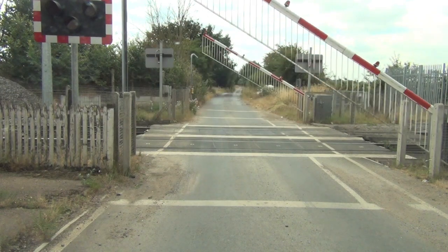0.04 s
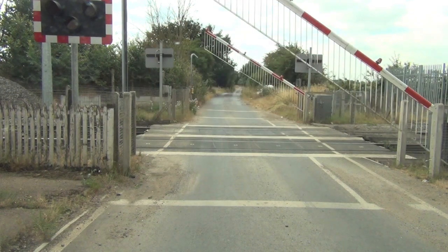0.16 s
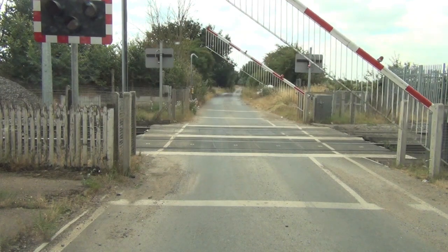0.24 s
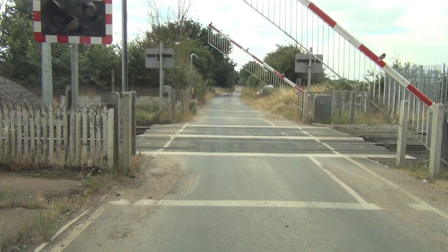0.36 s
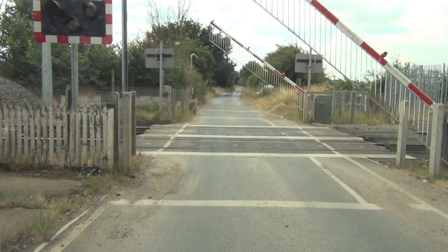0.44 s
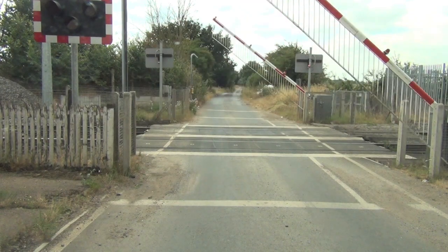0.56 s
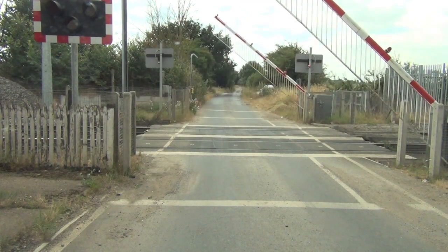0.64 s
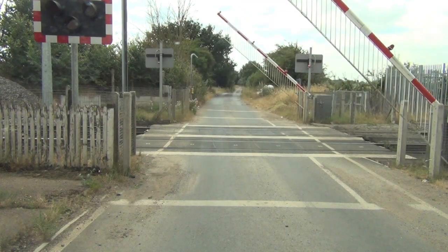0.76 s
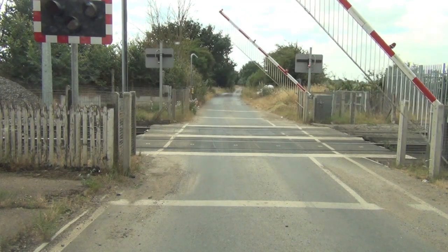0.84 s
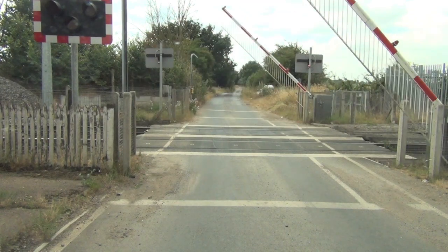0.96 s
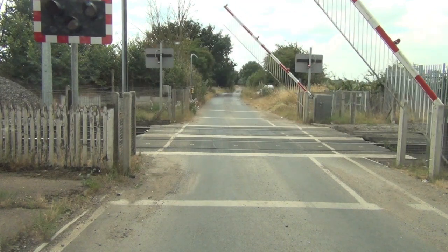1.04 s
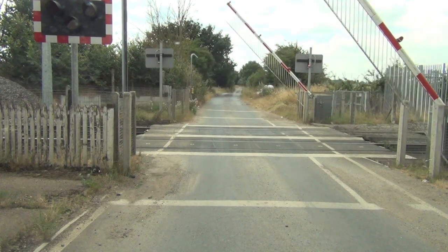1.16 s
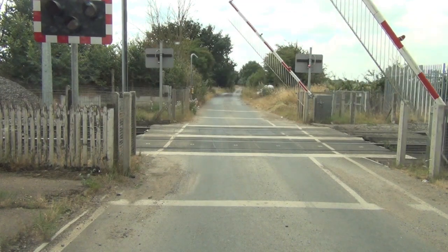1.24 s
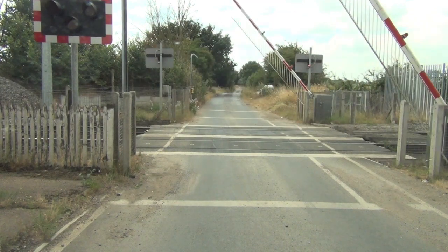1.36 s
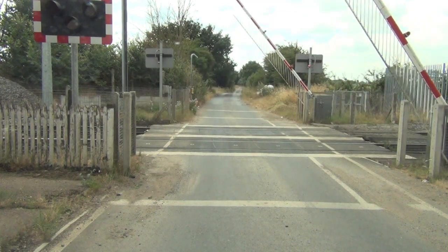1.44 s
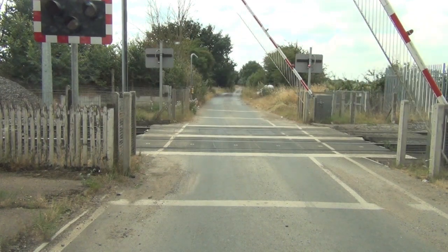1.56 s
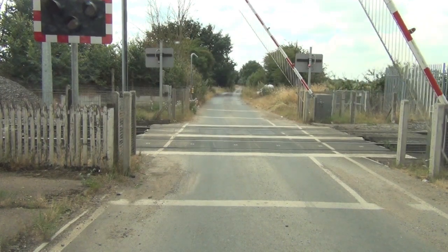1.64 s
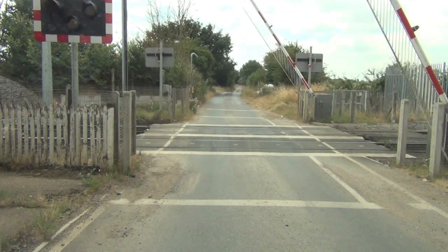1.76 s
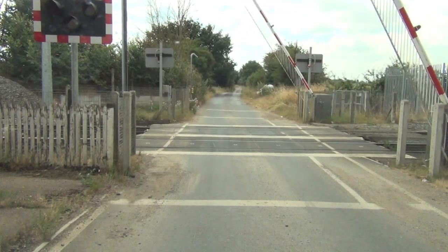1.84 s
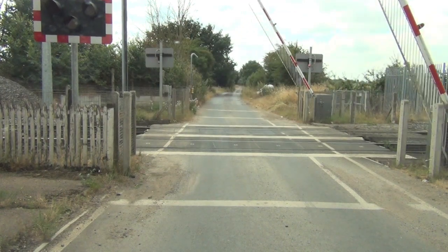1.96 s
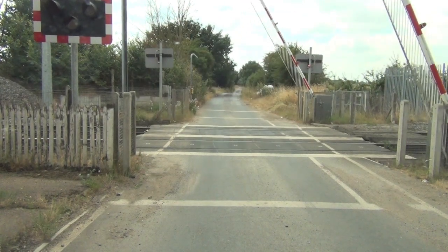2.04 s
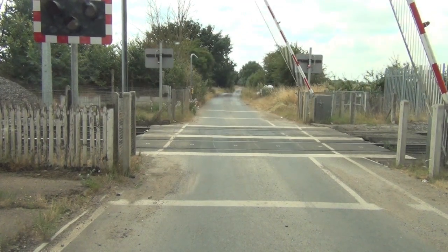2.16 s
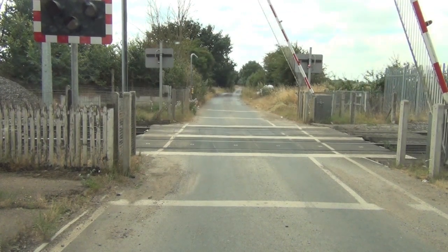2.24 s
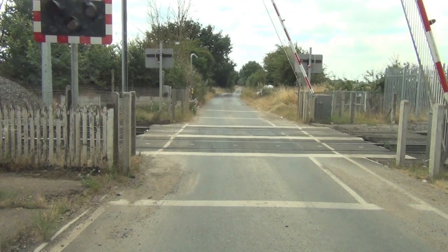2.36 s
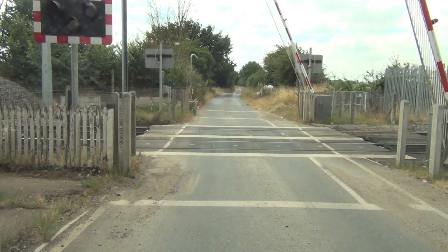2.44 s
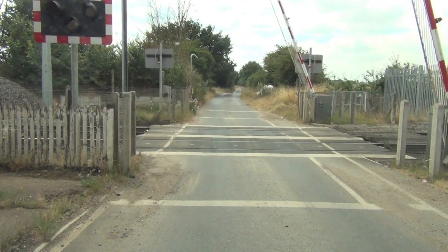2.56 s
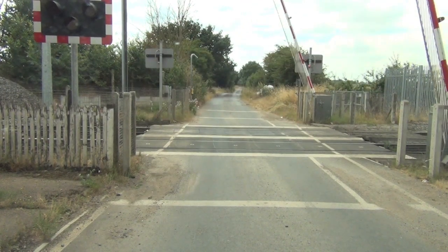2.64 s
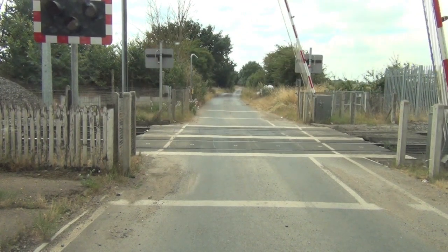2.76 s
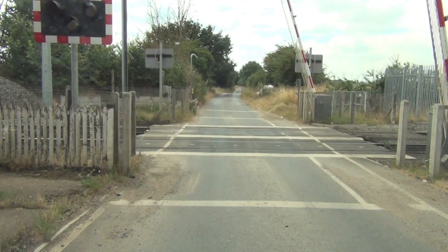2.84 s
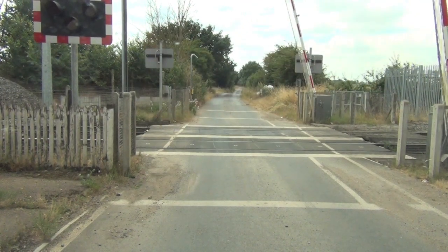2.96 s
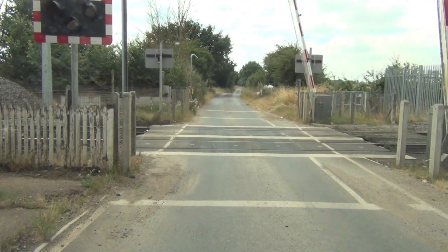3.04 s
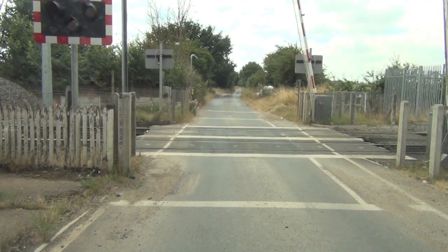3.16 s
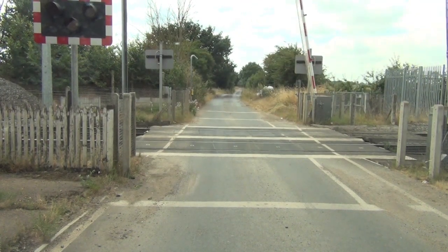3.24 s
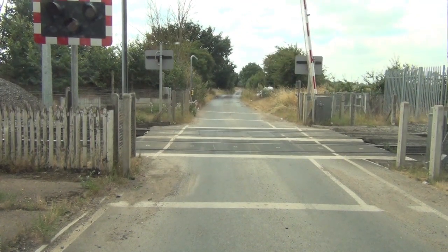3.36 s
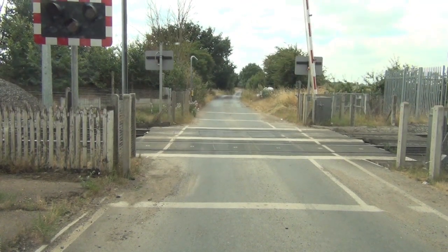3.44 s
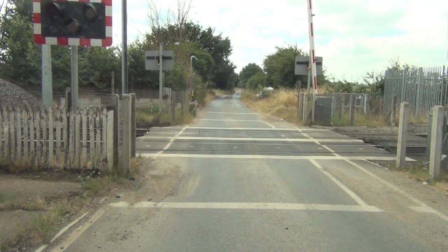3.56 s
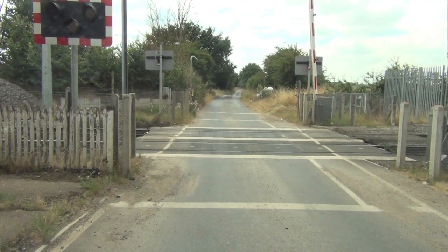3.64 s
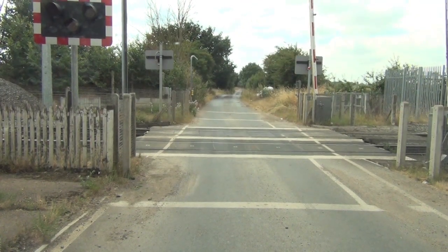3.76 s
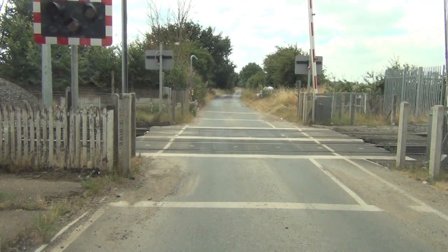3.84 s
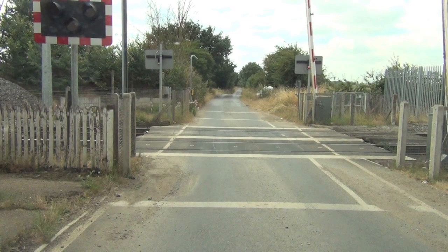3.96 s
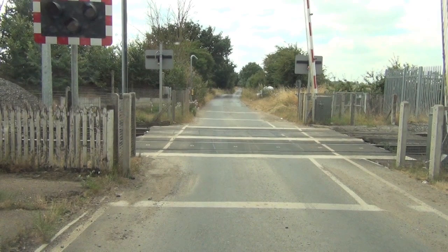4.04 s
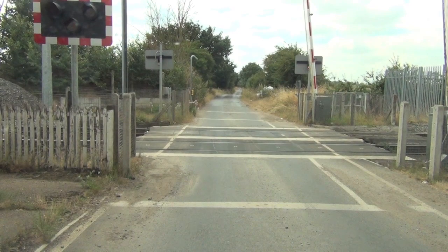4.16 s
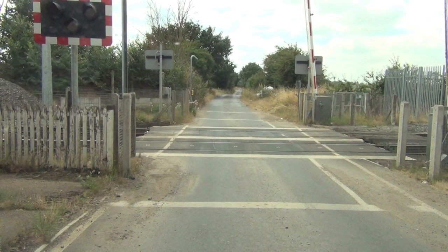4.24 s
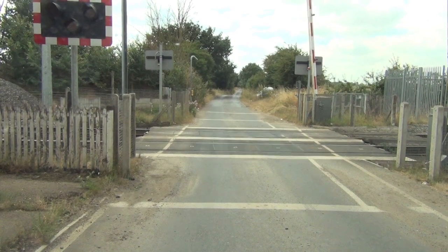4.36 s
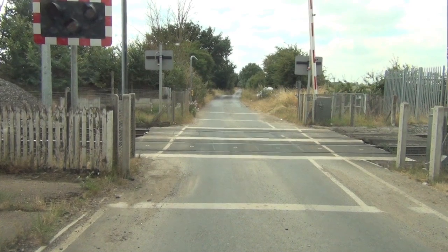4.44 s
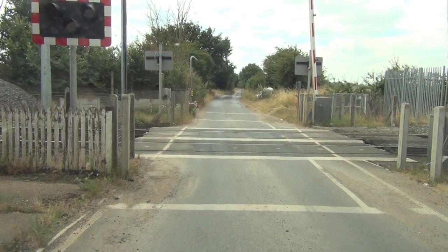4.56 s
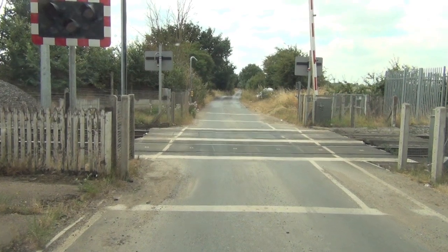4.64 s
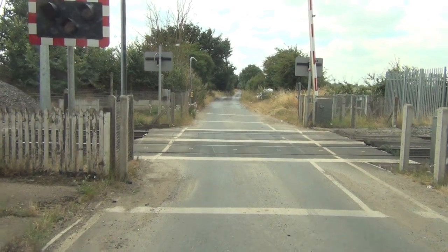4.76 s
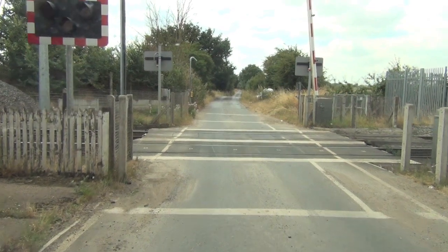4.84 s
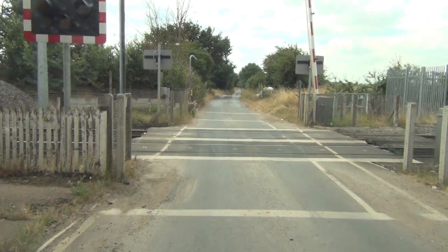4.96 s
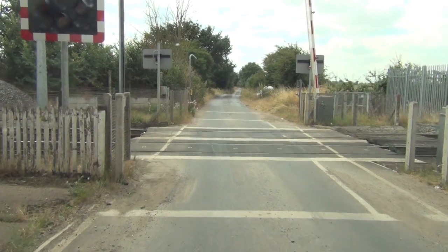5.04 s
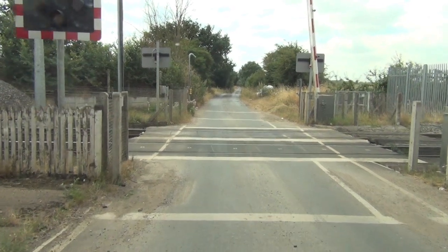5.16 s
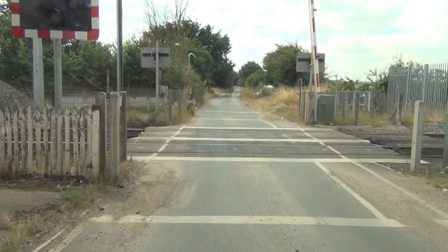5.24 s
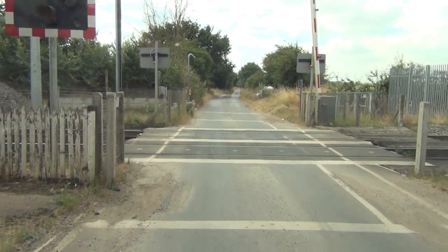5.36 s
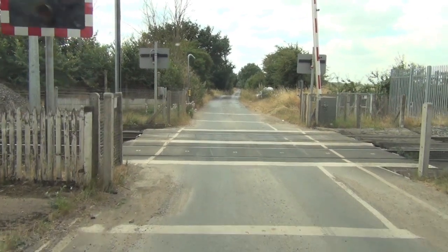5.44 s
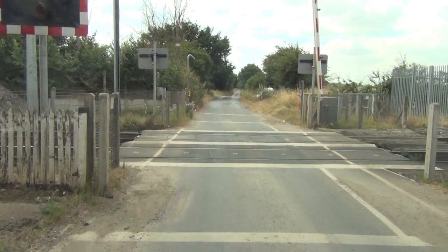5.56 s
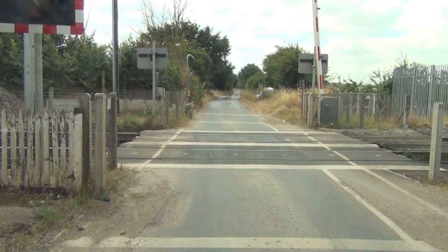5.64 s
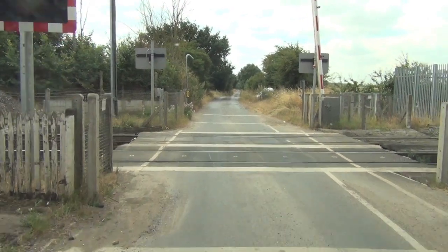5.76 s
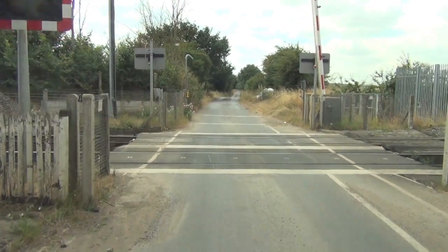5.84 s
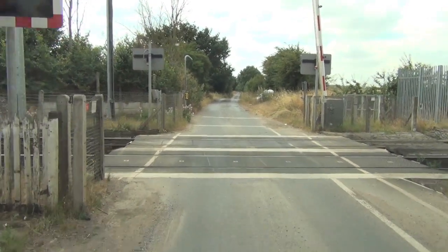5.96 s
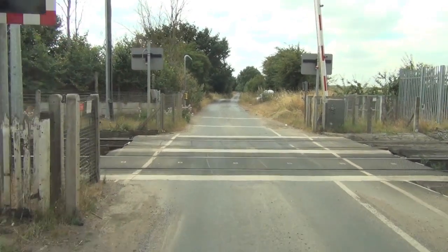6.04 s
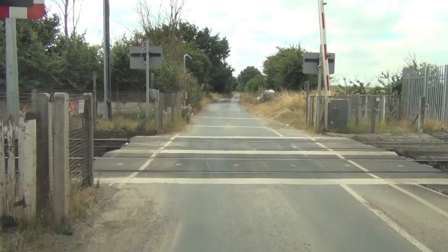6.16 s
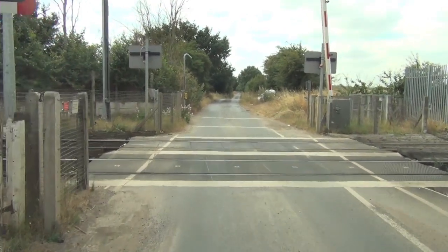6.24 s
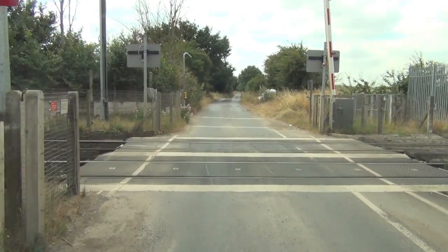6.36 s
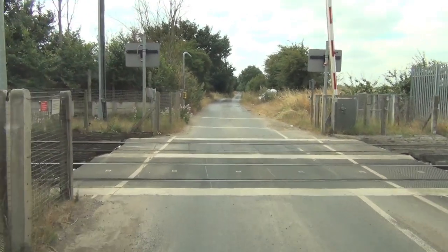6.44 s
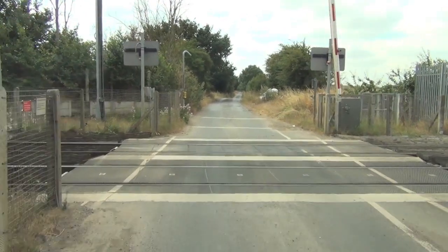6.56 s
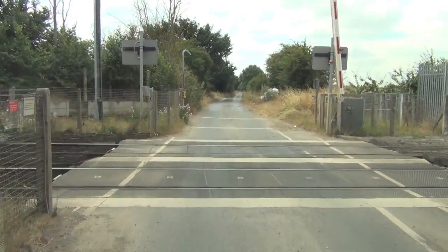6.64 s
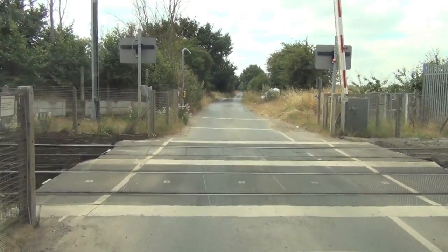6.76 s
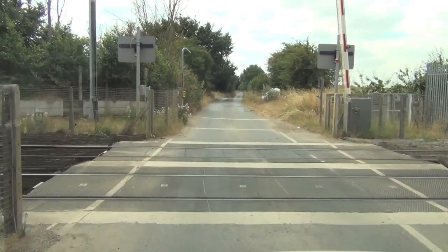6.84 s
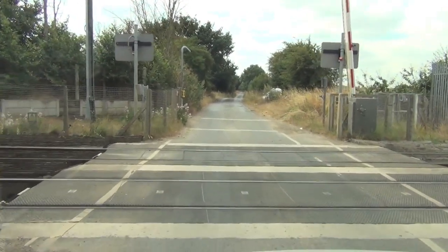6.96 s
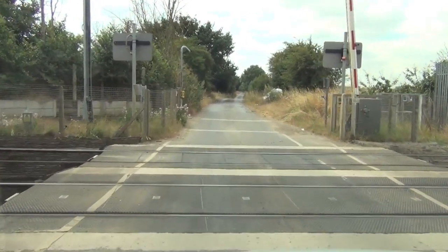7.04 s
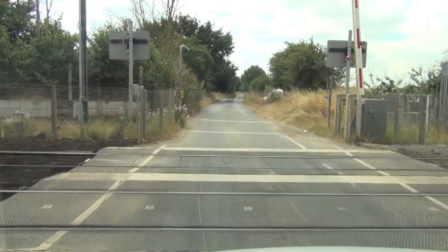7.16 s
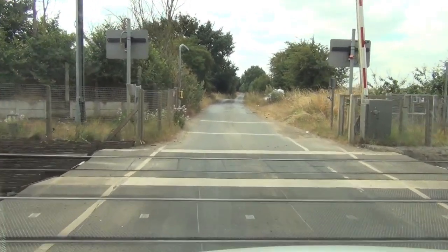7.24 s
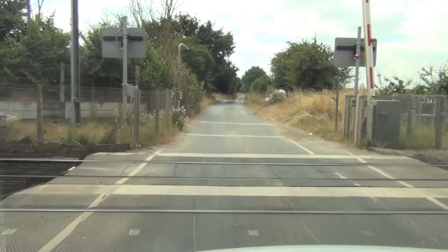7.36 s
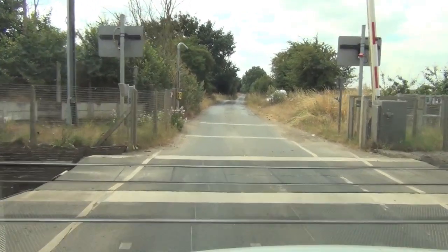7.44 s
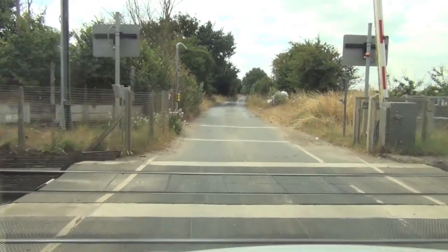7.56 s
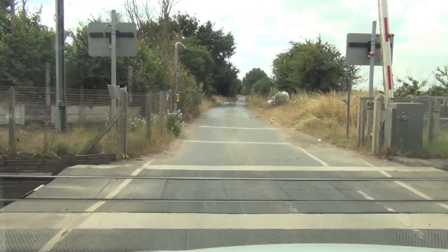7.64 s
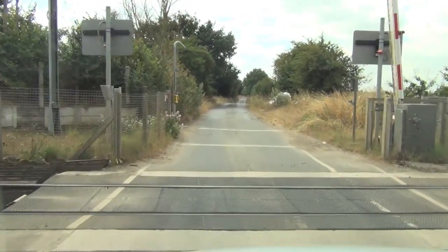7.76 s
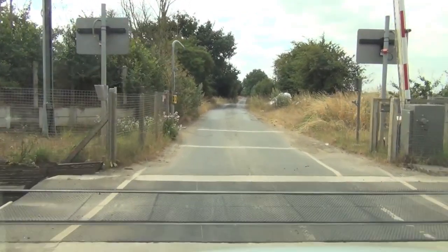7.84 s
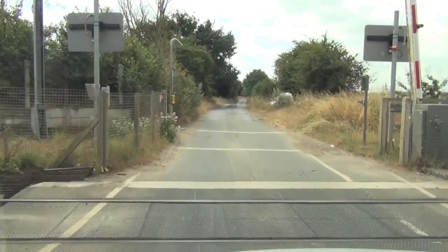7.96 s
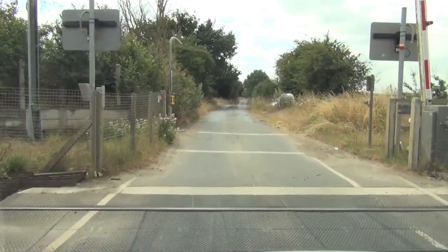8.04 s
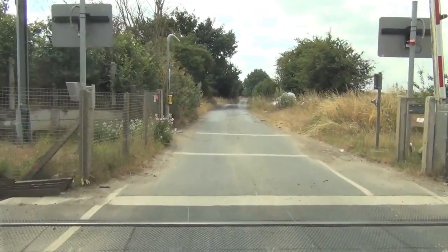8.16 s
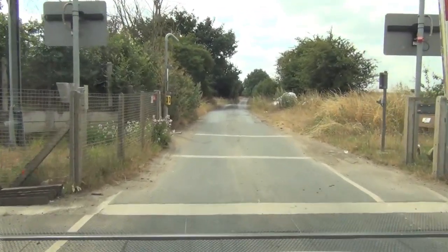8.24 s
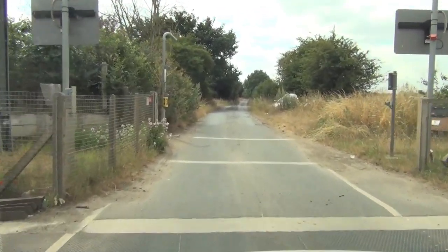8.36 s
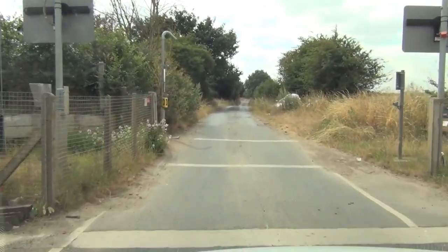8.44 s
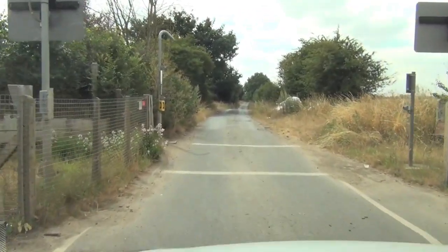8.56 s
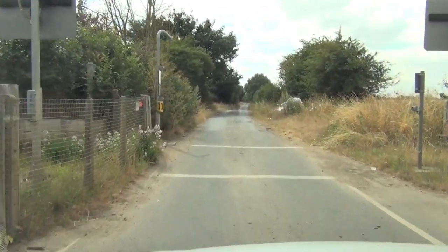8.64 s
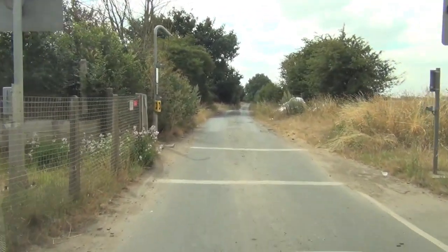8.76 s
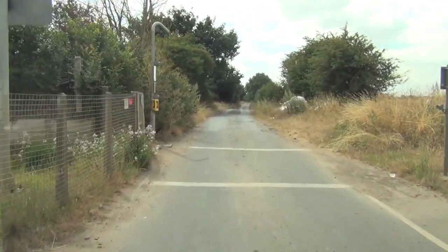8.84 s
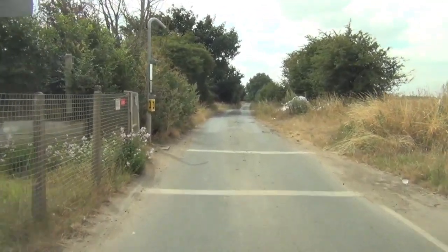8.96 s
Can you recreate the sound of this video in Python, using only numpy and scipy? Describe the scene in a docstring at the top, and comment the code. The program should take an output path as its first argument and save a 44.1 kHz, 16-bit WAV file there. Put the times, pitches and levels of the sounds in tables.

```python
"""Small car over a level crossing

Heard from inside: controls click, the starter cranks, and the four-cylinder engine catches, idles, is revved
and pulls away. A lever knocks, the door locks snap, and tyres thump over the rails, shaking the trim.
The engine is firing-rate harmonics plus pulsed noise, the starter a whirr plus gear noise, and the small parts
are decaying noise bursts. Blows excite panel resonances, over faint hiss and a thin interrupted whine."""
import sys
import numpy as np
from scipy import signal
from scipy.fft import rfft, irfft, next_fast_len
from scipy.io import wavfile
from scipy.ndimage import uniform_filter1d

SR = 44100
rng = np.random.default_rng(int(sys.argv[2]) if len(sys.argv) > 2 else 0)


def bounce(signal):
    """Save signal as a 16-bit WAV file at the path given by the first command-line argument."""
    frames = np.transpose(np.atleast_2d(signal))
    limited = np.clip(frames, -1, 1)
    pcm = np.round(limited * 32767).astype(np.int16)
    wavfile.write(sys.argv[1], SR, pcm)


N = 397341
TIME = np.arange(N) / SR


def from_db(db):
    """Amplitude gain is an exponential function of level in decibels."""
    return 10 ** (np.asarray(db) / 20)


def rms_one(x):
    """Normalisation: division by the root mean square gives unit power."""
    return x / np.sqrt(np.mean(x ** 2) + 1e-20)


def in_time(rows):
    """Linear interpolation: each column of a curve at every sample."""
    s, *columns = np.transpose(rows)
    return [np.interp(TIME, s, column) for column in columns]


def at_hz(points, hz):
    """Logarithmic frequency: a curve in dB is read between its points on a log axis."""
    curve = np.array(points)
    return np.interp(np.log(hz), np.log(curve[:, 0]), curve[:, 1])


def coloured(x, db_at):
    """Linear filtering: each frequency is weighted by a smooth dB curve."""
    size = next_fast_len(N + 4096, True)
    hz = np.maximum(np.arange(size // 2 + 1) * SR / size, 1)
    return irfft(rfft(x, size) * from_db(db_at(hz)), size)[:N]


# cabin resonances: (centre [Hz], width [Hz], boost [dB])
CABIN_MODES = [(378, 10.4, 4.5), (817, 46, 5), (1647, 140, 3.5), (3546, 57, 4), (6150, 550, 3.5)]


def noise(spectrum, resonances=CABIN_MODES):
    """Source and resonator: random noise takes the source spectrum and the resonant peaks, at unit rms."""
    def db_at(hz):
        db = at_hz(spectrum, hz)
        for centre, width, boost_db in resonances:
            db = db + boost_db / (1 + (2 * (hz - centre) / width) ** 2)
        return db
    return rms_one(coloured(rng.standard_normal(N), db_at))


def drift(rate_hz):
    """Low-pass random process: slow chance variation with unit rms, computed on every 40th sample."""
    step = 40
    pole = np.exp(-2 * np.pi * rate_hz * step / SR)
    chance = rng.standard_normal(N // step + 2002)
    slow = signal.lfilter([1], [1, -2 * pole, pole * pole], chance)[2000:]  # settled part
    return np.interp(np.arange(N) / step, np.arange(len(slow)), rms_one(slow))


def ramp(start, length):
    """Linear onset: rises from 0 to 1 over a stretch of time."""
    return np.clip((TIME - start) / max(length, .01), 0, 1)


def swell(s, length):
    """Gaussian envelope: a smooth rise and fall, down to 1/e at `length` either side of a moment."""
    return np.exp(-((TIME - s) / length) ** 2)


def burst(length, t60):
    """Exponential decay: a contact holds for a moment, then falls 60 dB in t60 seconds."""
    return from_db(-60 * np.maximum(TIME[:SR // 2] - length, 0) / max(t60, .005))


def add(out, s, sound):
    """Superposition: a sound is summed in at its time."""
    i = max(round(s * SR), 0)
    out[i:i + len(sound)] += sound[:max(N - i, 0)]


def piece(x):
    """Random sampling: half a second from somewhere in a noise."""
    i = rng.integers(N - SR)
    return x[i:i + SR // 2]


# spectrum of the still cabin: (frequency [Hz], relative density [dB per Hz])
STILL_SPECTRUM = [(18, -41), (30, -8), (89, -1), (190, -1.5), (328, -8), (384, -7.5), (837, -16),
                  (4200, -35.5), (13900, -38), (15000, -39)]


def still_cabin(level_db=-43):
    """Stationary noise: a steady hiss and low murmur lie under everything."""
    return from_db(level_db) * noise(STILL_SPECTRUM)


def whine(whine_hz=15625, level_db=-57.5, gaps_hz=50, gap_share=.22):
    """Gated pure tone: a thin high sine is broken briefly at a regular rate."""
    on = uniform_filter1d(1. * (TIME * gaps_hz % 1 > gap_share), size=130)  # soft edges
    return from_db(level_db) * np.sqrt(2) * on * np.sin(2 * np.pi * whine_hz * TIME)


# shell rumble and shell shudder: (frequency [Hz], relative density [dB per Hz])
RUMBLE_SPECTRUM = [(32, -42), (55, -13), (90, 1), (106, -3), (162, -6), (232, -10.5), (326, -30),
                   (431, -22), (600, -29.5), (780, -48), (1320, -120)]
SHUDDER_SPECTRUM = [(14, -22), (24, -13), (45, 16), (60, 4), (90, 10.5), (200, -71)]
# air resonances that the road excites: (centre [Hz], width [Hz], boost [dB])
AIR_MODES = [(117.3, 13.5, 5.5), (213, 28, 5)]
# road drive to the shell, growing with road speed: (time [s], relative level [dB])
ROAD_DRIVE = [(0, -50), (1.6, -40.5), (2.75, -43), (3.3, -31.5), (5.4, -31.5), (6.4, -24), (7.4, -20.5),
              (7.9, -16), (9.01, -17.5)]
# the car rocks as the engine catches, takes up the drive and meets uneven road:
# (time [s], rumble level [dB], shudder level [dB], half-width [s])
JOLTS = [(1.86, -26, -23.5, 0.065), (2.012, -26.5, -26, 0.113), (3.0, -30, -30, 0.048),
         (3.51, -20.5, -46, 0.12), (4.283, -28.5, -43, 0.11), (6.9, -26.5, -27, 0.16)]
# the wheels drop over the rails: (time [s], relative level [dB], panel pitch [Hz])
RAIL_BLOWS = [(8.12, -5.5, 97.7), (8.385, -6, 112.2), (8.681, -5.5, 116.8), (8.965, -7.5, 104)]


def body(shudder_db=-13, rumble_db=-.5, rail_shudder_db=-14, rail_rumble_db=-13, rail_lag=0.032, rail_length=0.063):
    """Forced vibration: the shell shudders on its springs and rumbles with the road, jolts and rails."""
    road = from_db(in_time(ROAD_DRIVE)[0])
    rails = sum(from_db(db) * swell(s + rail_lag, rail_length) for s, db, hz in RAIL_BLOWS)
    rumble = from_db(rumble_db) * road + from_db(rail_rumble_db) * rails
    shudder = from_db(shudder_db) * road + from_db(rail_shudder_db) * rails
    for s, jolt_rumble_db, jolt_shudder_db, length in JOLTS:
        rumble = rumble + from_db(jolt_rumble_db) * swell(s, length)
        shudder = shudder + from_db(jolt_shudder_db) * swell(s, length)
    return shudder * noise(SHUDDER_SPECTRUM) + rumble * noise(RUMBLE_SPECTRUM, AIR_MODES)


# airy hiss of scuffs and engine intake: (frequency [Hz], relative density [dB per Hz])
HISS_SPECTRUM = [(1500, -27), (2500, 1), (4800, -4), (6400, -5.5), (8400, -7.5), (12000, -11), (14000, -16),
                 (16000, -21)]
# tyres scuffing onto the crossing panels: (time [s], level [dB])
SCUFFS = [(8.08, -48), (8.345, -49.5)]


def scuffs(length=0.023):
    """Friction noise: rubber brushes over an edge in a short swell of hiss."""
    return noise(HISS_SPECTRUM) * sum(from_db(db) * swell(s, length) for s, db in SCUFFS)


# clicking plastic, its snap and its tap: (frequency [Hz], relative density [dB per Hz])
TICK_SPECTRUM = [(1500, 5), (3000, -0.5), (4500, 6), (6200, 2), (8000, -1.5), (11000, 2), (15000, 2.5),
                 (17000, -32)]
TAP_SPECTRUM = [(300, -47), (600, 10), (1100, 3.5), (2300, -2.5), (3500, -13.5), (7000, -44)]


def clicks(events, tick_db, tap_db, tick_t60, tap_t60, ring_db=-2, contact=0.00041):
    """Impulsive excitation: small plastic parts snap, each ringing at pitches of its own as it dies away."""
    out, tick, tap = np.zeros(N), noise(TICK_SPECTRUM), noise(TAP_SPECTRUM)
    for s, treble_db, middle_db in events:
        treble = (tick, treble_db + tick_db, tick_t60, rng.uniform(3600, 12400))
        middle = (tap, middle_db + tap_db, tap_t60, rng.uniform(830, 3740))
        for stuff, db, t60, ring_hz in (treble, middle):
            snap = piece(stuff)
            ring = rms_one(signal.lfilter(*signal.iirpeak(ring_hz, 7, fs=SR), snap))
            add(out, s, from_db(db) * burst(contact, t60) * (snap + from_db(ring_db) * ring))
    return out


# loose trim ticking on the bumps: (time [s], relative treble level [dB], relative middle level [dB])
TRIM_TICKS = [(8.13, -26.5, -24.5), (8.176, -37, -34), (8.4445, -36, -37), (8.558, -35.5, -34),
              (8.679, -25, -20.5), (8.6913, -24.5, -26), (8.709, -21.5, -32), (8.735, -33, -38),
              (8.765, -26.5, -39), (8.8055, -34, -36), (8.835, -32, -35)]


def trim_rattle():
    """Loose contact: shaken trim ticks with a short decay."""
    return clicks(TRIM_TICKS, tick_db=-8.0, tap_db=-7.0, tick_t60=0.018, tap_t60=0.047)


# clicks of keys and controls: (time [s], relative treble level [dB], relative middle level [dB])
CONTROL_CLICKS = [(.288, -50, -33), (.318, -29, -29.5), (.326, -25.5, -48), (.48, -41, -43),
                  (.519, -46, -39), (.604, -29, -33.5), (.704, -30.5, -54), (.75, -41.5, -41.5),
                  (.846, -30.5, -36), (.892, -33.5, -41), (.948, -38, -34.5), (1.073, -61, -30.5),
                  (1.136, -41.5, -36), (1.294, -48, -37), (1.692, -53, -37), (1.834, -45, -34),
                  (1.8435, -30, -28), (1.9517, -26, -40), (1.991, -33.5, -35), (2.01, -37, -43),
                  (2.092, -33, -48), (2.233, -44, -36.5), (2.333, -34.5, -34), (2.64, -34.5, -30.5),
                  (4.367, -33, -45), (4.456, -32, -46), (4.546, -42, -44), (4.658, -43.5, -40),
                  (6.141, -36, -34), (6.442, -36.5, -27)]


def control_clicks():
    """Snap action: keys and controls click, with a longer tail of cabin reflections."""
    return clicks(CONTROL_CLICKS, tick_db=-8.0, tap_db=-8.0, tick_t60=0.068, tap_t60=0.089)


def clack(rattle, length, t60):
    """Frequency-dependent damping: in a quick chatter of contacts the treble dies first."""
    low = signal.lfilter(*signal.butter(1, 1200, fs=SR), rattle)
    return low * burst(length, t60 * 3.25) + (rattle - low) * burst(length, t60 * 1.33)


# spectrum of hard contacts: (frequency [Hz], relative density [dB per Hz])
CLACK_SPECTRUM = [(150, -35), (250, 4), (480, 3), (850, -6), (1200, -18), (2300, -19), (2900, -16.5),
                  (4000, -19), (8000, -21.5), (15000, -12.5)]
# levers and suspension hitting their stops:
# (time [s], relative level [dB], contact length [s], base decay time [s], low-pass corner [Hz])
STOP_HITS = [(0.318, -32, 0.01, 0.068, 9000), (0.601, -37.5, .006, 0.071, 6000),
             (4.172, -17.5, 0.0087, 0.046, 5700), (8.119, -35, 0.027, 0.093, 1200),
             (8.378, -16, 0.02, 0.05, 750), (8.691, -13, 0.007, 0.074, 1200)]


def knocks(chatter_db=3.5, crack=1.0):
    """Impact and transmission: levers and floor-muffled suspension hit stops, the first contact hardest."""
    out, rattle = np.zeros(N), noise(CLACK_SPECTRUM) * from_db(chatter_db * drift(120))
    for s, db, length, t60, corner_hz in STOP_HITS:
        hit = signal.lfilter(*signal.butter(1, corner_hz, fs=SR), piece(rattle))
        add(out, s, from_db(db) * clack(hit, length, t60) * (1 + crack * burst(0, 0.051)))
    return out


# spectrum of the door locks: (frequency [Hz], relative density [dB per Hz])
LOCK_SPECTRUM = [(200, -22), (370, 4), (600, -4.5), (850, -9), (1200, -13.5), (2300, -16), (3000, -19),
                 (6000, -26.5), (9000, -33.5), (15000, -43)]
# resonances of the door latch: (centre [Hz], width [Hz], boost [dB])
LATCH_MODES = [(575, 53, 9.5), (700, 61, 8), (1600, 88, 7), (1970, 87, 5), (2340, 250, 5.5)]


def door_locks(s=6.153, level_db=-14, length=0.023, t60=0.064, chatter_db=0.5, crack=0.86):
    """Impact on a resonator: the latches snap home in one chatter, the first contact hardest."""
    out, rattle = np.zeros(N), noise(LOCK_SPECTRUM, LATCH_MODES) * from_db(chatter_db * drift(170))
    add(out, s, from_db(level_db) * clack(piece(rattle), length, t60) * (1 + crack * burst(0, 0.071)))
    return out


def thump(hz, rise, loose=0.52):
    """Resonant response: a soft blow swells and fades in one panel mode, with looser shaking around it."""
    t = TIME[:SR // 2]
    age = t / max(rise, .002)
    band = signal.butter(2, [hz / 1.64, hz * 1.51], "band", fs=SR, output="sos")
    shake = rms_one(signal.sosfilt(band, rng.standard_normal(len(t))))
    return age * np.exp(1 - age) * (np.sin(2 * np.pi * hz * t) + loose * shake)


# dull blows of controls, starter and gearbox: (time [s], relative level [dB], panel pitch [Hz], rise [s])
BODY_BLOWS = [(.31, -30.5, 185.5, 0.021), (.611, -27, 171.6, 0.029), (0.885, -20.5, 193, 0.0085),
              (1.322, -11.5, 170.4, 0.021), (1.845, -13.5, 172, 0.0079), (2.039, -17, 197, 0.016),
              (3.315, -13, 178, 0.0064), (3.455, -14, 124, 0.025), (4.175, -5, 156, 0.0081),
              (4.359, -18.5, 128, 0.017), (4.564, -13, 141, .01), (6.16, -10.5, 230, 0.0095)]


def thumps(level_db=-2, rail_rise=0.021, rebound_s=0.081, rebound_db=-10.5):
    """Impact and rebound: blows sound the body, and each rail blow is followed by one suspension bounce."""
    out = np.zeros(N)
    for s, db, hz, rise in BODY_BLOWS:
        add(out, s, from_db(db + level_db) * thump(hz, rise))
    for s, db, hz in RAIL_BLOWS:
        add(out, s, from_db(db + level_db) * thump(hz, rail_rise))
        add(out, s + rebound_s, from_db(db + level_db + rebound_db) * thump(0.76 * hz, rail_rise))
    return out


# seconds: the engine fires, then takes this long to run up to idle
CATCH_S, RUN_UP_S = 1.72, .2
# seconds: first compression under the starter, and time to the next
CRANK_S, STROKE_S = 1.32, 0.1336
# the starter slows under load, then coasts down
WHIRR_HZ, SAG_HZ_PER_S, COAST_HZ_PER_S = 348, 100, 90
# the starter gains the last part of its speed as cranking begins
SPIN_UP_S, SPIN_UP_SHARE = .16, .25
# spectrum of the starter gears: (frequency [Hz], relative density [dB per Hz])
GRIND_SPECTRUM = [(50, -11), (150, 10), (300, 13), (650, -2.5), (1500, -12.5), (3000, -22.5), (6500, -27.5),
                  (12000, -36)]
# resonances of the starter housing: (centre [Hz], width [Hz], boost [dB])
HOUSING_MODES = [(630, 200, 6), (1075, 47, 10), (1476, 91, 9), (2190, 160, 6)]


def starter(level_db=-23, fade_db_per_s=-13, dip_db=-17, lead=.05, attack=0.053, whirr=0.77,
            grind_db=-3, teeth_db=3):
    """Loaded rotation: whirr and uneven gear grind swell at each compression and coast once the engine fires."""
    age, coasting = np.maximum(TIME - CRANK_S, 0), np.maximum(TIME - CATCH_S, 0)
    # the level dips between compressions until the engine has run up
    slack = np.sin(np.pi * age / STROKE_S) ** 4 * (1 - ramp(CATCH_S, RUN_UP_S))
    hz = np.maximum(WHIRR_HZ - SAG_HZ_PER_S * age - COAST_HZ_PER_S * coasting, 0)
    spun_up = 1 - SPIN_UP_SHARE * (1 - ramp(CRANK_S - lead, SPIN_UP_S))
    phase = 2 * np.pi * np.cumsum(hz * spun_up * (1 + 0.0205 * drift(42))) / SR
    motor = np.sin(phase) + 0.23 * np.sin(2 * phase) + 0.082 * np.sin(3 * phase)
    grind = from_db(grind_db + teeth_db * drift(36)) * noise(GRIND_SPECTRUM, HOUSING_MODES)
    fade = from_db(level_db + fade_db_per_s * age + dip_db * slack)
    level = ramp(CRANK_S - lead, attack) * fade * hz / WHIRR_HZ
    return level * (whirr * motor + grind)


# engine speed once it runs: (time [s], firing rate [Hz])
FIRING_RATE = [(2.3, 28.2), (2.92, 25.8), (3.14, 37.0), (3.2, 38.9), (3.41, 37.4), (3.52, 39.6),
               (4.06, 40.1), (4.44, 50.6), (4.86, 50.7), (5.01, 46.4), (5.17, 45.9), (5.57, 47.3),
               (5.92, 45.8), (6.33, 45.8), (6.95, 56.0), (7.14, 60.8), (7.6, 69.1), (8.0, 56.1)]
# engine effort: (time [s], relative level [dB])
ENGINE_EFFORT = [(2.1, -41), (2.44, -44), (3.21, -40), (3.35, -39.5), (4.44, -33.5), (5.02, -35.5),
                 (5.27, -33.5), (5.71, -34.5), (7.31, -30), (8.25, -34.5), (8.61, -34), (9.0, -37.5)]
# the driver eases off and the engine tones drop: start [s], duration [s], change [dB]
LIFT_S, LIFT_TAKES_S, LIFT_DB = 7.63, .25, -7.5
# cabin boom at the lowest engine orders: (frequency [Hz], level relative to effort [dB])
BOOM_RESPONSE = [(27, -13), (40, -20), (47, -3), (55, 3), (68, 0.5), (79, -8), (93, 3.5), (102, -5.5),
                 (122, -0.5), (148, -11), (210, -3)]
# engine drone: (multiple of the firing rate, relative level [dB])
DRONE_ORDERS = [(4, -9.5), (4.5, -8.5), (5, -10.5), (6, -0.5), (7, -3), (8, -5), (9, -3), (10, -6.5),
                (11, 0.5), (12, -5.5), (13, -1), (15, -1), (17, -1)]
# combustion, and mechanical rasp: (frequency [Hz], relative density [dB per Hz])
COMBUSTION_SPECTRUM = [(140, -5), (240, -3), (290, -3.5), (390, -11.5), (520, -11), (700, -15.5),
                       (830, -15), (960, -23), (1100, -19.5), (1350, -26), (2050, -30), (2600, -43),
                       (4000, -54), (6000, -85)]
RASP_SPECTRUM = [(800, -22), (1300, -1), (1950, 0), (2600, -15), (5000, -30)]
# intake gulps as the engine catches and each time the throttle opens wide:
# (time [s], level [dB], half-width [s])
INTAKE_GULPS = [(1.892, -58, 0.49), (3.5, -55.5, 0.082), (7.478, -55.5, 0.15)]


def engine_boom(phase, rate):
    """Room response: clean low harmonics of the firing rate boom as they pass the cabin's resonances."""
    boom = 0
    for k in range(1, 4):
        tone = np.sqrt(2) * np.sin(k * phase + rng.uniform(0, 2 * np.pi))
        boom = boom + from_db(at_hz(BOOM_RESPONSE, k * rate)) * tone
    return boom


def engine_drone(phase, rate, labour_hz, level_db=1.5, db_per_hz=-0.15, rough=0.26, wobble=0.045):
    """Modulated harmonics: higher engine orders, coloured by the bulkhead, waver in strength and phase."""
    drone = 0
    for k, db in DRONE_ORDERS:
        strength = from_db(db + at_hz(COMBUSTION_SPECTRUM, k * rate)) * (1 + rough * drift(2.65))
        # uneven firing blurs the high orders most
        drone = drone + strength * np.sin(k * phase + wobble * k * drift(9.8) + rng.uniform(0, 2 * np.pi))
    # the drone stands out while the engine labours at low speed
    return drone * from_db(level_db + db_per_hz * np.maximum(rate - labour_hz, 0))


def engine(effort_db=5, labour_hz=47, combustion_db=-1, hiss_db=-58, hiss_follows=1.6, cruise_db=-30,
           rasp_db=-29, rasp_db_per_hz=0.32, throb=0.16):
    """Periodic combustion: firing makes tonal boom and drone, and noise that pulses with each firing."""
    caught = ramp(CATCH_S, RUN_UP_S)
    rate = in_time(FIRING_RATE)[0] * (1 + caught) / 2  # runs up from half speed
    burn_db = in_time(ENGINE_EFFORT)[0] + effort_db
    tone_db = burn_db + LIFT_DB * ramp(LIFT_S, LIFT_TAKES_S)
    phase = 2 * np.pi * np.cumsum(rate * (1 + 0.0019 * drift(12.7))) / SR
    tones = caught * from_db(tone_db) * (engine_boom(phase, rate) + engine_drone(phase, rate, labour_hz))
    combustion = caught * from_db(burn_db + combustion_db) * noise(COMBUSTION_SPECTRUM)
    # the intake hiss grows faster than the effort
    intake = from_db(hiss_db + hiss_follows * (burn_db - cruise_db))
    intake = intake + sum(from_db(db) * swell(s, length) for s, db, length in INTAKE_GULPS)
    rasp_level_db = tone_db + rasp_db + rasp_db_per_hz * (rate - labour_hz)
    rasp = from_db(rasp_level_db) * caught * noise(RASP_SPECTRUM)
    pulse = rms_one(1 + throb * np.cos(phase))
    return tones + pulse * (combustion + intake * noise(HISS_SPECTRUM) + rasp)


# stereo balance: (frequency [Hz], left minus right [dB])
STEREO_LEAN = [(40, 13.5), (110, 1), (200, -2), (380, 1), (700, .5), (1290, 3), (2400, 1), (4400, 1.5),
               (8000, 4), (13000, -2)]


def scene(spread_db=-22, near_db=-17):
    """Superposition and stereo: all sources sum almost alike in both channels, with weak opposite-sign parts."""
    controls = control_clicks() + knocks() + door_locks()
    trim = trim_rattle()
    cabin = still_cabin() + body() + scuffs() + trim + controls + thumps() + starter() + engine()
    # a reflection from the side windows arrives with opposite sign in the two channels
    side = from_db(spread_db) * np.interp(TIME - .006, TIME, cabin)
    # the treble of small nearby parts differs more between the channels
    near = np.interp(TIME - .0007, TIME, controls + trim)
    side = side + from_db(near_db) * signal.lfilter(*signal.butter(2, 3000, "high", fs=SR), near)
    left = coloured(cabin + side, lambda hz: at_hz(STEREO_LEAN, hz) / 2)
    right = coloured(cabin - side, lambda hz: -at_hz(STEREO_LEAN, hz) / 2)
    return np.array([left, right]) + whine()


def record(dry, cutoff_hz=16000):
    """Saturation and band-limiting: the highest peaks are rounded off and the top treble is cut."""
    held = dry / (1 + dry ** 6) ** (1 / 6)
    return signal.sosfilt(signal.ellip(10, .1, 80, cutoff_hz, fs=SR, output="sos"), held)


dry = scene()
out = record(dry)
bounce(out)
```